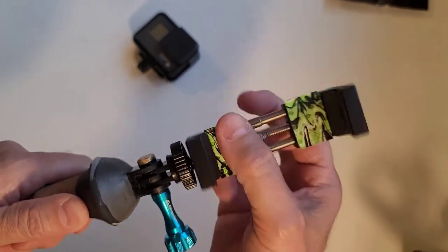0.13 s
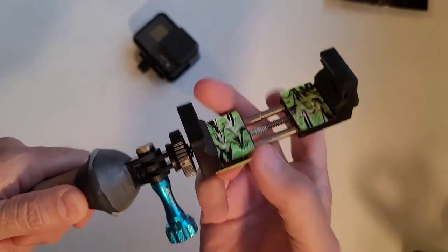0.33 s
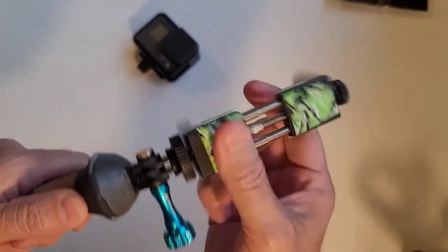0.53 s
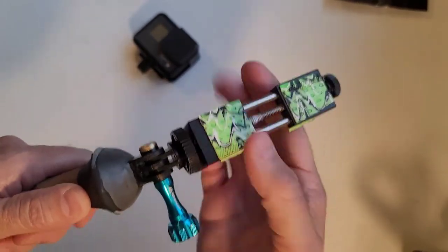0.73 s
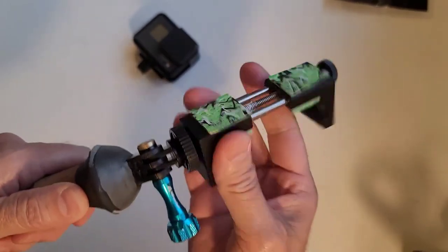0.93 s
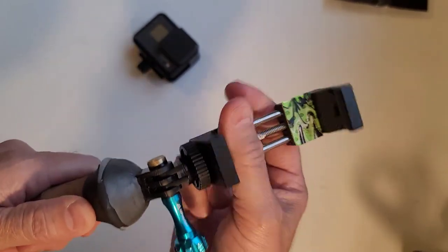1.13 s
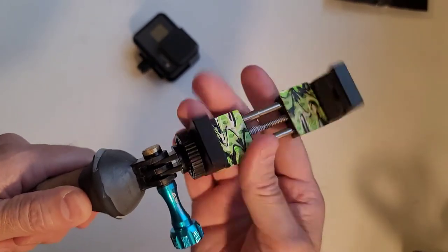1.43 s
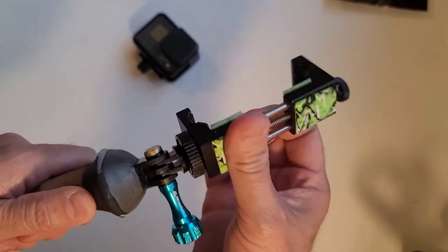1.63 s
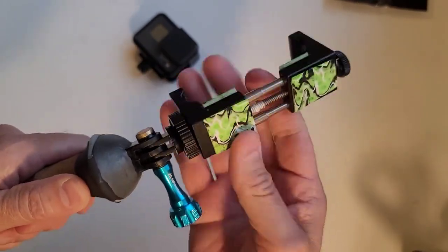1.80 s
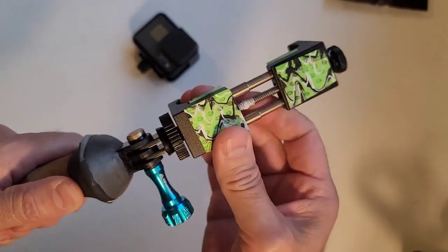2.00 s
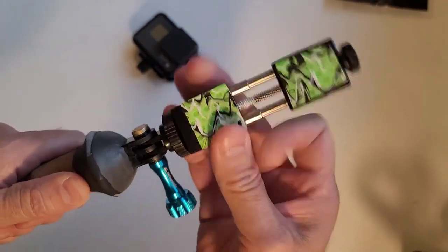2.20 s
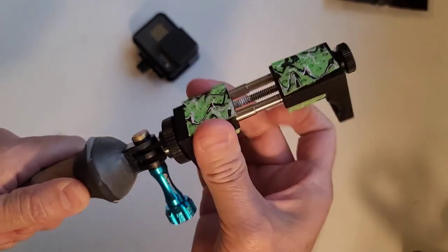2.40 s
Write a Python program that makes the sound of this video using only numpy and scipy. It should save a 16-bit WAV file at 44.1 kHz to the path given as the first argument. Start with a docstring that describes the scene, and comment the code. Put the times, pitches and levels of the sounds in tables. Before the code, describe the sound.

Small metal and plastic clamp clicking and clacking in the hands, with one early dull thump

```python
"""In a small room, close up over a table, a metal and plastic phone clamp is turned onto a threaded adapter.
Its loose jaws click and clack: gritty contact bursts excite resonances of the metal, rods and plastic.
The thread rubs as dense tiny slips, fingers squeak by stick-slip, and knocks ring the hollow grip.
Early dull pushes set deep modes booming. Beneath lie rustles of the hands, swells of the room's bass,
rumble, hum and hiss, with a short echo of the handling."""
import sys
import numpy as np
from scipy import signal
from scipy.fft import rfft
from scipy.io import wavfile

SR = 44100
rng = np.random.default_rng(int(sys.argv[2]) if len(sys.argv) > 2 else 0)


def to_wav(sig):
    """Store sig (one row per channel, or 1-D mono) as 16-bit WAV at the path in sys.argv[1].

    Samples outside -1..1 are clipped; the rate is SR.
    """
    pcm = np.clip(np.atleast_2d(sig), -1, 1) * 32767
    pcm = np.round(pcm).astype(np.int16)
    wavfile.write(sys.argv[1], SR, pcm.T)  # frames by channels


N = 112454
T = np.arange(N) / SR   # time [s]


def from_db(db):
    """The decibel law for amplitude: 20 dB is a factor of ten."""
    return 10 ** (np.asarray(db) / 20)


def pan(db):
    """Level difference between the ears: left minus right [dB], split evenly."""
    return from_db(np.array([[0.5], [-0.5]]) * db)


def decay(age, t60):
    """Exponential decay: 60 dB lost in each t60 [s], starting at age zero."""
    return from_db(-60 * np.maximum(age, 0) / t60)


def swell(s, rise, fall):
    """Gaussian envelope peaking at time s, with rise and fall as standard deviations [s]."""
    width = np.where(T < s, rise, fall)
    return np.exp(-((T - s) / width) ** 2 / 2)


def rms_one(x):
    """Normalization of the mean power to one."""
    return x / np.sqrt(np.mean(x ** 2) + 1e-20)


def cut(x, hz, kind="low", order=2):
    """Butterworth filtering, low-pass or high-pass, with a maximally flat passband."""
    return signal.sosfilt(signal.butter(order, hz, kind, fs=SR, output="sos"), x + 1e-18)


def stereo_noise(likeness, size=N):
    """Interchannel correlation: mid and side white noises mixed to a given likeness (-1 to 1)."""
    mid, side = rng.standard_normal((2, size))
    alike = np.clip(likeness, -1, 1)
    opposed = side * [[1], [-1]]
    return (np.sqrt(1 + alike) * mid + np.sqrt(1 - alike) * opposed) / np.sqrt(2)


def coloured(x, spectrum):
    """Spectral shaping: noise weighted by a curve over log frequency, at unit rms."""
    hz, db = np.transpose(spectrum)
    f = np.maximum(np.fft.rfftfreq(x.shape[-1], 1 / SR), 1)
    gain = from_db(np.interp(np.log(f), np.log(hz), db))
    return rms_one(np.fft.irfft(rfft(x) * gain, x.shape[-1]))


def resonate(x, modes):
    """Modal superposition: parallel two-pole resonances of given width, with alternating signs."""
    out = 0
    for k, (hz, width, db) in enumerate(modes):
        r = np.exp(-np.pi * width / SR)   # pole radius: a wider mode dies sooner
        poles = [1, -2 * r * np.cos(2 * np.pi * hz / SR), r * r]
        gain = (-1) ** k * from_db(db) * (1 - r * r) / 2
        out = out + gain * signal.lfilter([1, 0, -1], poles, x + 1e-18)
    return out


def soft_blows(blows, modes):
    """Impulse response of damped modes convolved with the force of rounded pushes."""
    force = 0
    for s, db, length in blows:
        push = np.sin(np.pi * np.clip((T - s) / length, 0, 1)) ** 2
        force = force + from_db(db) * push / (push.sum() + 1e-9)
    ringing = sum(from_db(db) * decay(T, t60) * np.sin(2 * np.pi * hz * T) for hz, db, t60 in modes)
    return signal.fftconvolve(force, ringing)[:N]


# spectrum of the low rumble of the room: (frequency [Hz], relative level [dB])
RUMBLE_SPECTRUM = [(15, -11), (28, -6.5), (42, -21), (55, 7), (72, -12), (100, -14.5), (140, -14.5),
                   (200, -24), (400, -26.5), (1000, -65.5)]
# spectrum of the soft hiss of the room: (frequency [Hz], relative level [dB])
HISS_SPECTRUM = [(100, -11), (280, 2.5), (420, -2), (600, -8.5), (1000, -11.5), (2500, -13.5),
                 (6800, -20.5), (8500, -24.5), (12500, -29), (16000, -25.5)]
ROOM_RUMBLE_DB, ROOM_HISS_DB = -52, -56.5
HUM_HZ, HUM_DB = 54.2, -61


def background():
    """Stationary noise: a low rumble alike in both ears, a faint pure hum and a wider soft hiss."""
    hum = from_db(HUM_DB) * np.sqrt(2) * np.sin(2 * np.pi * HUM_HZ * T)
    rumble = from_db(ROOM_RUMBLE_DB) * coloured(stereo_noise(0.82), RUMBLE_SPECTRUM)
    hiss = from_db(ROOM_HISS_DB) * coloured(stereo_noise(-0.23), HISS_SPECTRUM)
    return hum + rumble + hiss * pan(1.8)


# spectrum of the echo: (frequency [Hz], relative level [dB])
ECHO_SPECTRUM = [(100, -8.5), (500, 12.5), (1000, 6.5), (2200, 2.5), (6000, -3.5), (11000, -3), (16000, -3)]
ECHO_DB, ECHO_BUILD_S, ECHO_SPLIT_HZ = -11, 0.0017, 5500
ECHO_T60_S, ECHO_TREBLE_T60_S = 0.21, 0.24


def room(x, size=22050):
    """Diffuse reverberation: convolution with decaying noise whose treble lasts slightly longer."""
    t = T[:size]
    noise = coloured(stereo_noise(-0.079, size=size), ECHO_SPECTRUM)
    lower = cut(noise, ECHO_SPLIT_HZ) * decay(t, ECHO_T60_S)
    treble = cut(noise, ECHO_SPLIT_HZ, "high") * decay(t, ECHO_TREBLE_T60_S)
    tail = (lower - treble) * (1 - np.exp(-t / ECHO_BUILD_S))
    impulse_response = rms_one(tail) / np.sqrt(size)
    return from_db(ECHO_DB) * signal.fftconvolve(x, impulse_response, axes=1)[:, :N]


# dull rustles of the shifting hands, and slow swells of the room's bass near 55 Hz:
# (time of peak [s], level [dB], rise [s], fall [s], centre frequency [Hz])
SOFT_SWELLS = [(0.271, -41.5, 0.014, 0.026, 205), (.28, -54.5, 0.033, 0.066, 512),
               (.44, -57.5, .06, 0.089, 203), (0.659, -50.5, 0.15, 0.085, 499),
               (.68, -42.5, 0.043, 0.044, 53.3), (1.04, -56, 0.11, 0.043, 564),
               (1.15, -48.5, .07, 0.13, 55.6), (1.401, -53.5, 0.032, 0.036, 152),
               (1.73, -58, 0.028, 0.031, 625), (1.81, -47.5, 0.064, 0.034, 53.8),
               (2.359, -59.5, 0.06, 0.053, 230)]
SWELL_WIDTH = 0.49   # bandwidth as a share of the centre frequency
SWELL_APART_HZ = 380   # above this the two sides are opposed rather than alike


def rustles_and_bass_swells():
    """Band-limited noise in soft, low swells: rustles of the hands and, near 55 Hz, the room's bass."""
    out = 0
    for s, db, rise, fall, hz in SOFT_SWELLS:
        band = [(hz, SWELL_WIDTH * hz, 0)]
        noise = stereo_noise(max(1 - (hz / SWELL_APART_HZ) ** 2, -0.35))
        band_noise = rms_one(resonate(resonate(noise, band), band))
        out = out + from_db(db) * swell(s, rise, fall) * band_noise
    return out


# dull pushes that make the deep boom: (time [s], drive level [dB], contact [s])
DULL_PUSHES = [(.203, -21.5, 0.0076), (.2385, -13.5, 0.0095), (.385, -23, .012)]
# light bumps of the hand: (time [s], drive level [dB], contact [s])
HAND_BUMPS = [(1.305, -44, 0.0052), (1.365, -36.5, 0.0085), (1.408, -41.5, 0.0067), (1.475, -35.5, 0.013)]
# deep resonances of the boom: (frequency [Hz], level [dB], t60 before added damping [s])
DEEP_MODES = [(39.7, -4, 0.58), (57.66, -3, 1.24), (80.26, -5, 0.77), (103.35, 3, 0.86),
              (137.6, -12.5, 0.58), (215, -24, .45)]
# spectrum of the diffuse rumble after the thump: (frequency [Hz], relative level [dB])
THUMP_RUMBLE = [(20, -28), (38, -5), (60, -0.5), (110, 4), (150, -17.5), (230, -26.5), (400, -31),
                (800, -47.5), (2000, -63.5)]
RUMBLE_AT_S, RUMBLE_RISE_S, RUMBLE_HOLD_S = 0.21, 0.021, 0.13
RUMBLE_T60_S, RUMBLE_DB = 1, -30.5   # before added damping
DAMPED_AT_S, DAMPING_T60_S = 0.52, 0.57   # extra decay, on top of the modes' own
BUMP_RING_SHARE = 0.46   # of the modes' ringing time
THUMP_LOW_EDGE_HZ = 34


def thump():
    """Damped modal vibration: deep modes boom over a rumble; later bumps stir them only briefly."""
    age = T - RUMBLE_AT_S
    envelope = np.clip(age / RUMBLE_RISE_S, 0, 1) * decay(age - RUMBLE_HOLD_S, RUMBLE_T60_S)
    rumble = from_db(RUMBLE_DB) * envelope * coloured(stereo_noise(0.78), THUMP_RUMBLE)
    boom = soft_blows(DULL_PUSHES, DEEP_MODES) + rumble
    damped_boom = boom * decay(T - DAMPED_AT_S, DAMPING_T60_S)
    short_modes = [(hz, db, t60 * BUMP_RING_SHARE) for hz, db, t60 in DEEP_MODES]
    return damped_boom + soft_blows(HAND_BUMPS, short_modes)


# soft knocks on the hollow grip: (time [s], drive level [dB], contact [s])
GRIP_KNOCKS = [(1.110, -44, 0.0017), (1.2145, -36.5, 0.0014), (1.2195, -40.5, .001), (1.6265, -37, .001),
               (1.628, -48, 0.0039)]
# resonances of the hollow grip: (frequency [Hz], level [dB], t60 [s])
HOLLOW_MODES = [(160, -7.5, 0.073), (405, -1, 0.052), (647, -12.5, 0.019), (768, 0, 0.04)]


def knocks():
    """Impact excitation: brief soft forces ring the damped modes of the hollow grip."""
    return soft_blows(GRIP_KNOCKS, HOLLOW_MODES)


# short squeaks under the fingers: (time of peak [s], level [dB], frequency [Hz], 1/e half-length [s])
FINGER_SQUEAKS = [(1.192, -59, 1090, 0.017), (1.196, -54.5, 1923, 0.01), (1.200, -56, 680, 0.017),
                  (1.241, -47, 1372, 0.0049), (1.254, -58, 1500, 0.0092)]
SQUEAK_WOBBLE, SQUEAK_WOBBLE_HZ = 0.0428, 120.6   # rms share of the pitch, low-pass edge of the wander


def squeaks():
    """Stick-slip oscillation: brief tones whose pitch wanders at random."""
    out = 0
    for s, db, hz, length in FINGER_SQUEAKS:
        wobble = 1 + SQUEAK_WOBBLE * rms_one(cut(rng.standard_normal(N), SQUEAK_WOBBLE_HZ))
        tone = np.sqrt(2) * np.sin(2 * np.pi * np.cumsum(hz * wobble) / SR)
        out = out + from_db(db) * np.exp(-((T - s) / length) ** 2) * tone
    return out


# the clamp's metal parts: (frequency [Hz], width [Hz], level [dB])
METAL_MODES = [(3020, 430, -11), (3505, 500, -1.5), (3960, 300, 1), (4440, 120, 4.5), (5600, 520, -3),
               (6094, 100, 2.5), (6810, 160, 0.5), (7800, 170, 6.5), (11270, 1000, -3), (11260, 320, 4.5),
               (11850, 300, 8), (11930, 350, -7), (12940, 400, 1), (14900, 170, 5)]
# the faint ring of the rods and spring: (frequency [Hz], width [Hz], level [dB])
ROD_AND_SPRING_MODES = [(3812, 66, -7), (5670, 27, -13), (5880, 16, -2.5), (5750, 15, -5.5), (6920, 26, 0),
                        (10430, 28, 3), (11060, 29, 10.5), (12180, 43, -2), (13430, 41.5, -9.5)]
# the clamp's plastic body: (frequency [Hz], width [Hz], level [dB])
PLASTIC_MODES = [(602, 130, -5), (1109, 200, -2.5), (1793, 270, 4), (1990, 300, 5.5), (3330, 347, 6)]
CRACK_DB, CRACK_LOW_HZ = -11, 2300


def clamp(on_metal, on_plastic):
    """Modal response: a bare crack plus the ringing of metal, rods and plastic body."""
    crack = from_db(CRACK_DB) * cut(on_metal, CRACK_LOW_HZ, "high")
    metal = resonate(on_metal, METAL_MODES)
    rods = resonate(on_metal, ROD_AND_SPRING_MODES)
    return crack + metal + rods + resonate(on_plastic, PLASTIC_MODES)


# the thread rubs: (time of peak [s], drive level [dB], rise [s], fall [s], treble edge [Hz])
THREAD_RUBS = [(.055, -45.5, 0.039, 0.03, 9300), (0.53, -40.5, 0.018, 0.016, 14100),
               (1.021, -50, 0.052, 0.038, 13000), (1.10, -54.5, .03, 0.036, 10400),
               (1.611, -54, 0.034, 0.016, 12000), (2.281, -67.5, 0.025, 0.017, 11600)]
RUB_SLIPS_PER_S = 5000   # on average
RUB_HISS_DB, RUB_RING_DB, RUB_BODY_DB, RUB_PAN_DB = -3.5, -5, 2.5, -2


def rubs():
    """Friction noise: the turning thread sheds dense tiny slips that swell and fade with each twist."""
    force = 0
    for s, db, rise, fall, edge_hz in THREAD_RUBS:
        slips = stereo_noise(0) * (rng.random(N) < RUB_SLIPS_PER_S / SR)
        force = force + from_db(db) * swell(s, rise, fall) * cut(rms_one(slips), edge_hz)
    hiss = from_db(RUB_HISS_DB) * cut(force, CRACK_LOW_HZ, "high", order=1)
    ring = from_db(RUB_RING_DB) * clamp(force, force * from_db(RUB_BODY_DB))
    return (hiss + ring) * pan(RUB_PAN_DB)


# contacts of the clamp's parts: (time [s], drive level before CONTACT_DB [dB], 1/e decay [ms],
# treble edge [Hz], plastic body [dB], left minus right [dB], ring of the touched spot [Hz])
CONTACTS = [(0.024, -35, 1.4, 15000, -3, -5.5, 6330), (.063, -30, 1.43, 4500, 0.5, -5.5, 2170),
            (0.079, -40, 1.3, 4900, -2, 7, 3940), (.237, -53.5, 1.05, 11950, -7, 3, 7100),
            (0.445, -56.5, 3.5, 9000, -2.5, -8, 6240), (0.464, -41, 4.3, 10200, 3, 3, 11300),
            (0.4754, -42, 6, 10700, -0.5, 3, 4620), (.483, -41.5, 0.89, 10800, 5, 6, 6360),
            (0.537, -40, 3.1, 7000, 0, -12.5, 4400), (0.5611, -28, 8, 14600, -8, 11.5, 10860),
            (0.5662, -15, 3.2, 16000, -10.5, -0.5, 11320), (0.5675, -17, 1.5, 6920, -20, 1.5, 5030),
            (.577, -24.5, 2.04, 13000, -5.5, -8, 6600), (.6875, -50, 1.6, 9000, 11.5, -2, 3640),
            (.696, -46.5, 5.1, 7070, -1.5, 2, 1700), (.768, -45, 2.9, 11800, 2.5, -1, 11300),
            (.8035, -54, 1.8, 10800, -19, 0, 11500), (0.8476, -40.5, 1.73, 9800, -7.5, -2, 6270),
            (0.9523, -41, 4.2, 9600, -14, 1.5, 2150), (.9658, -35, 1.9, 12900, -0.5, 1, 5510),
            (1.008, -21.5, .6, 3760, -2.5, 5, 3200), (1.0083, -26, 1.14, 4970, -7, -3.5, 4980),
            (1.043, -36.5, 1.6, 4500, -18, 1, 2072), (1.102, -48, 3.9, 4500, -8, 9.5, 2100),
            (1.4725, -47, 1.6, 6500, -11, 1, 5030), (1.7205, -65, 1.2, 9000, -2.5, 4.5, 5500),
            (1.733, -48, 1.94, 11000, -0.5, -8, 5200), (1.8811, -20, 1.18, 11700, -5, -5, 6050),
            (2.072, -52, 2.1, 5000, -14, -8.5, 3660), (2.125, -47.5, 2, 11000, 5, -1, 6320),
            (2.1617, -73, 1.8, 9000, 4, 8, 6000), (2.176, -53, 2.6, 7900, 3, 13, 4540),
            (2.200, -37, 4.3, 7000, -10, -7, 4650), (2.2066, -42.5, 4.4, 10200, 2.5, 18, 6700),
            (2.2188, -21.5, 3.2, 14800, -0.5, -10, 10570), (2.2215, -17, 2.1, 14700, -1.5, 6, 11320),
            (2.2343, -19.5, 1.46, 10000, -9, 3, 6140), (2.237, -23, 1.12, 11030, -0.5, -6, 6770),
            (2.3155, -44, 2.2, 7000, -1, 2, 6000), (2.3632, -54, 1.5, 9100, -4, 5, 5500)]
CONTACT_DB = 5.5   # how strongly every contact drives the clamp
CLICK_GRAIN_DB, CLICK_LIKENESS = 1, 0.22   # random spread of grain levels, likeness of the two sides
SPOT_WIDTH_HZ, SPOT_DB = 307, 10.5
SCATTER_DB = -5.5   # share of the bare crack that radiates away into the room


def clicks(size=2048):
    """Impulsive excitation: gritty bursts of a few milliseconds ring the touched spot and the clamp."""
    metal, plastic, spots = np.zeros((3, 2, N + size))
    for s, db, decay_ms, edge_hz, body_db, pan_db, spot_hz in CONTACTS:
        grains = from_db(CLICK_GRAIN_DB * rng.standard_normal(size))
        envelope = np.exp(-T[:size] * 1000 / decay_ms)
        burst = stereo_noise(CLICK_LIKENESS, size=size) * grains * envelope
        # each side gets the energy of the smooth envelope, whatever the random grit
        burst = burst * np.sqrt(np.sum(envelope ** 2) / np.sum(burst ** 2, axis=1, keepdims=True))
        burst = cut(burst, edge_hz) * from_db(db + CONTACT_DB) * pan(pan_db)
        start = int(s * SR)
        span = slice(start, start + size)
        metal[:, span] += burst
        plastic[:, span] += burst * from_db(body_db)
        spots[:, span] += resonate(burst, [(spot_hz, SPOT_WIDTH_HZ, SPOT_DB)])
    metal, plastic, spots = metal[:, :N], plastic[:, :N], spots[:, :N]
    scatter = from_db(SCATTER_DB) * room(cut(metal, CRACK_LOW_HZ, "high", order=1))
    return spots + clamp(metal, plastic) + scatter


def scene():
    """Linear superposition: the handled clamp and its echo, rustles, bass swells, thump and background."""
    handling = clicks() + rubs() + squeaks() + knocks()
    echo = room(handling) * pan(-2)
    boom = cut(thump(), THUMP_LOW_EDGE_HZ, "high", order=4) * from_db([[-0.55], [0.45]])
    return background() + rustles_and_bass_swells() + boom + handling + echo


def record(dry):
    """Band limitation: an elliptic low-pass cuts the top steeply above 15.5 kHz."""
    return signal.sosfilt(signal.ellip(10, 0.3, 80, 15500, fs=SR, output="sos"), dry)


dry = scene()
out = record(dry)
to_wav(out)
```